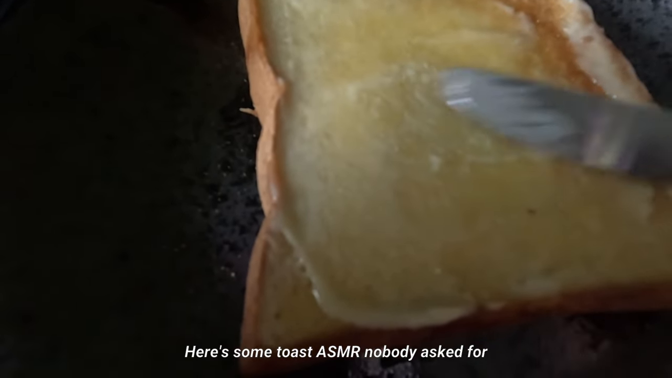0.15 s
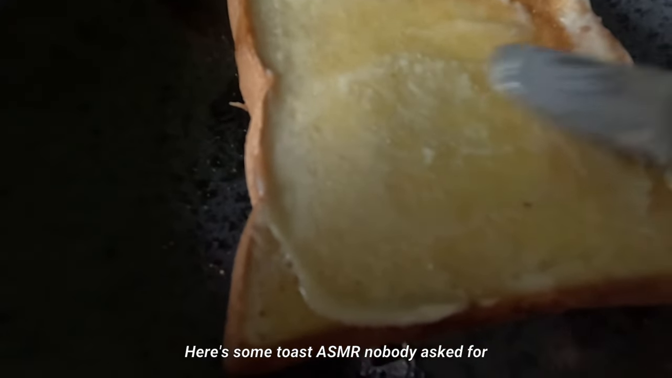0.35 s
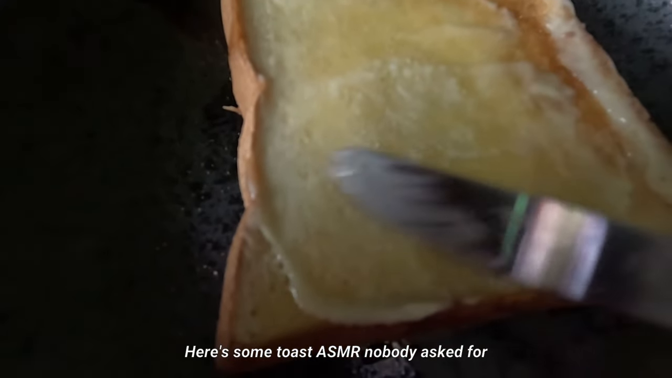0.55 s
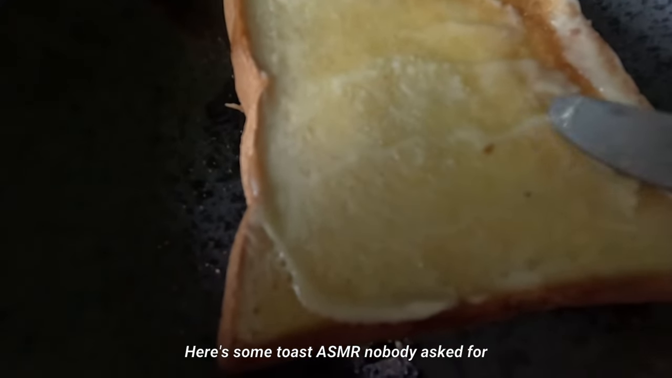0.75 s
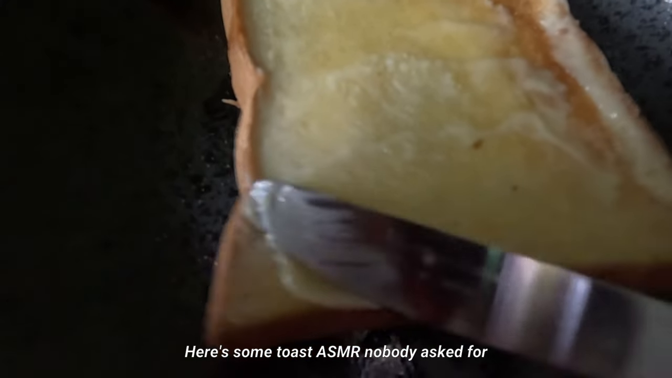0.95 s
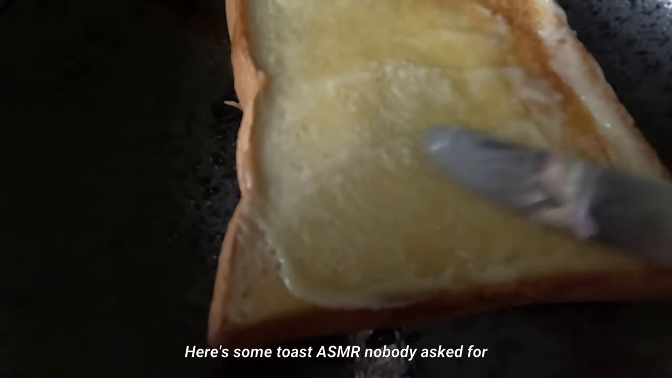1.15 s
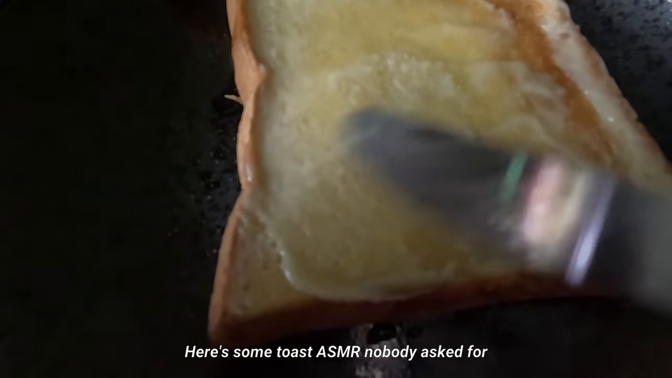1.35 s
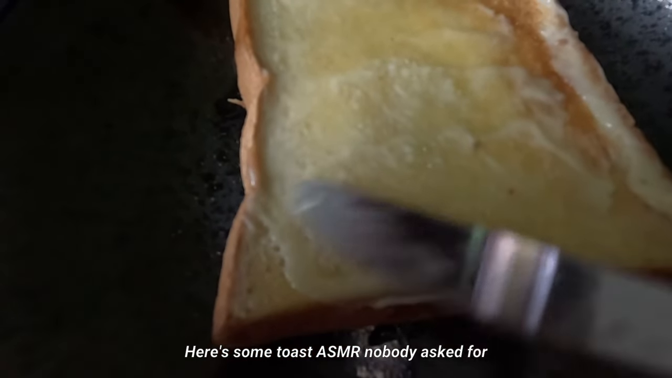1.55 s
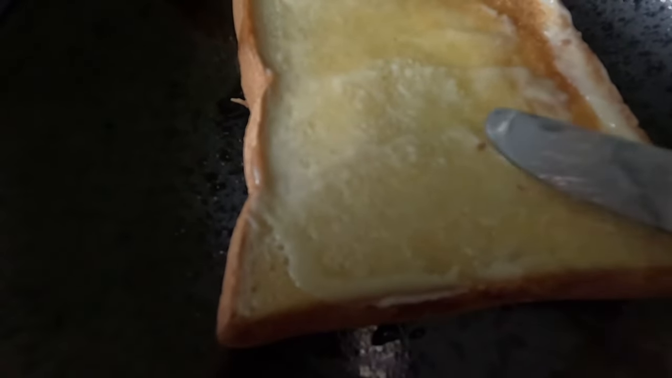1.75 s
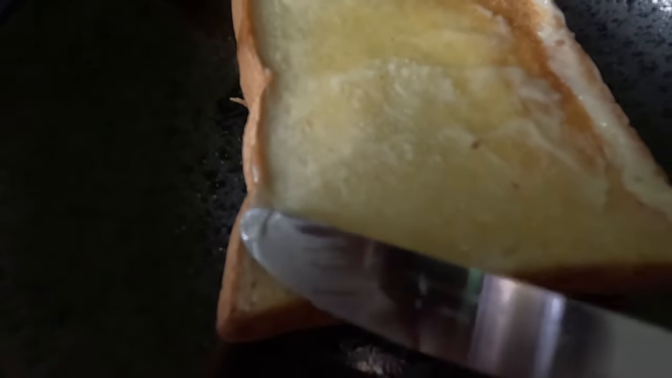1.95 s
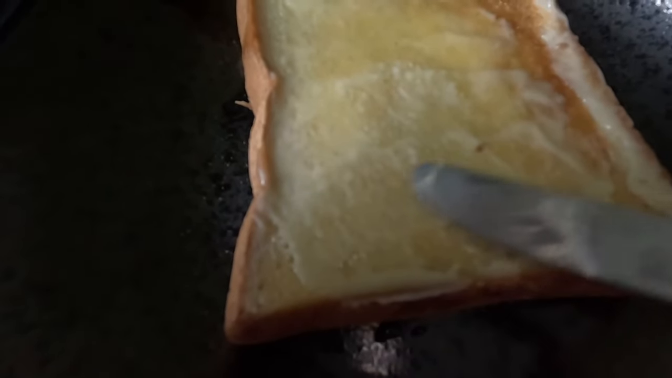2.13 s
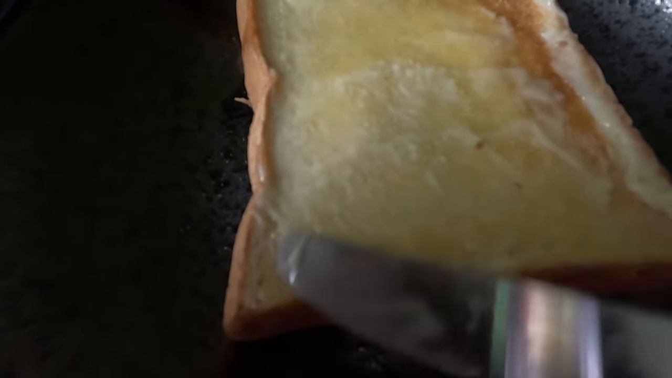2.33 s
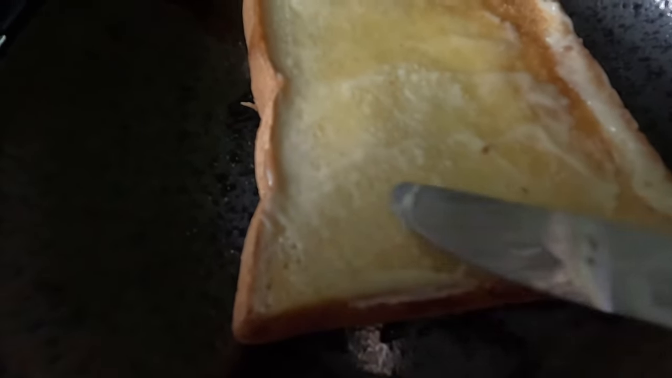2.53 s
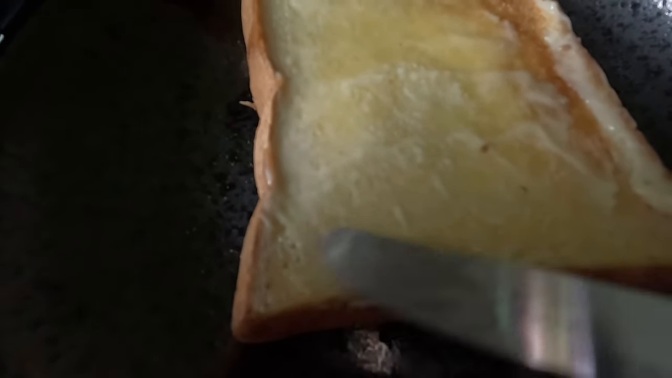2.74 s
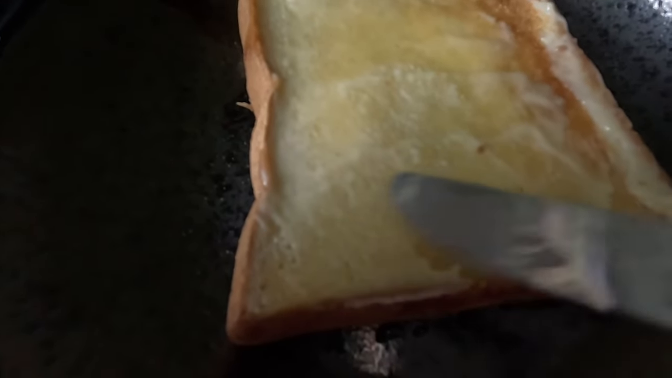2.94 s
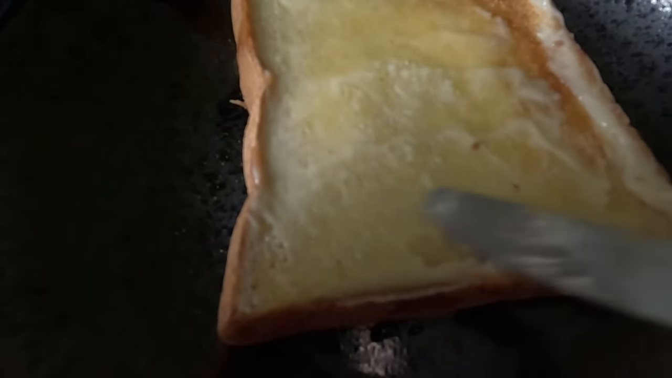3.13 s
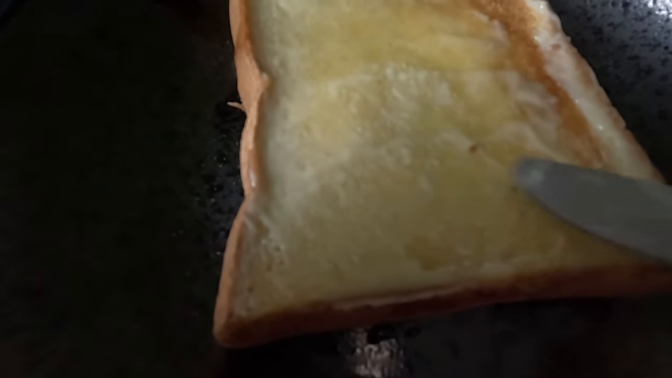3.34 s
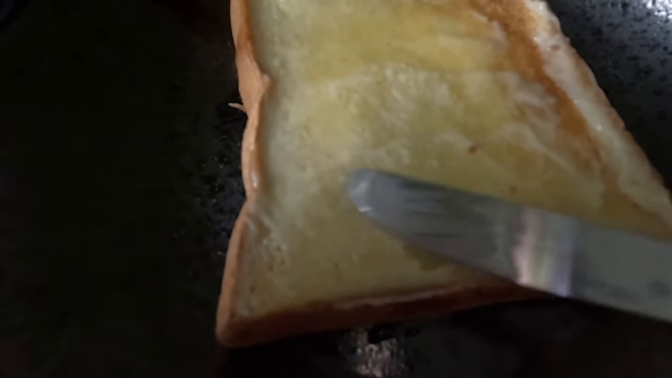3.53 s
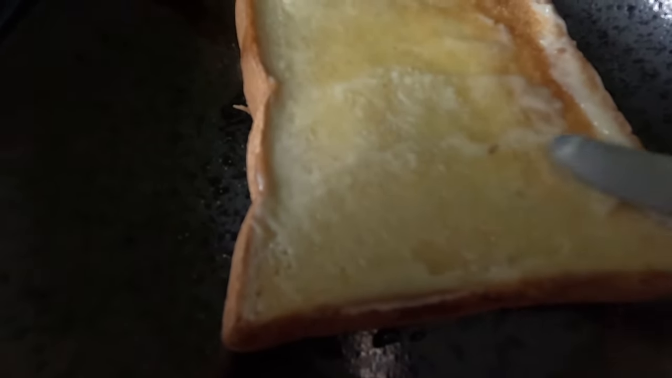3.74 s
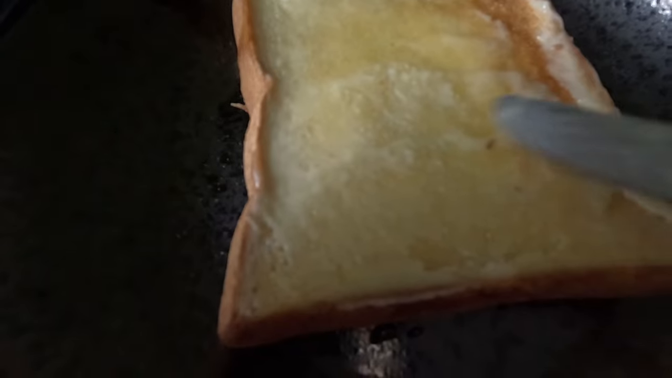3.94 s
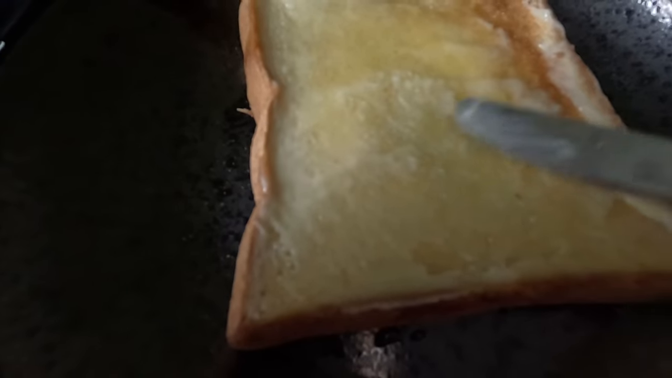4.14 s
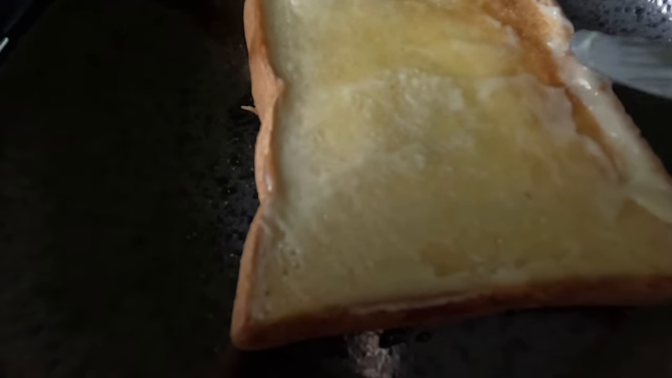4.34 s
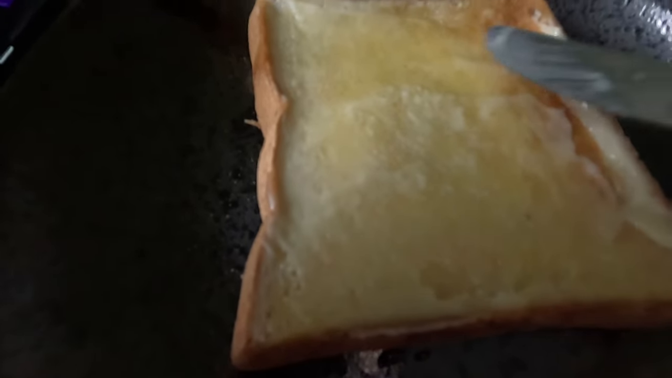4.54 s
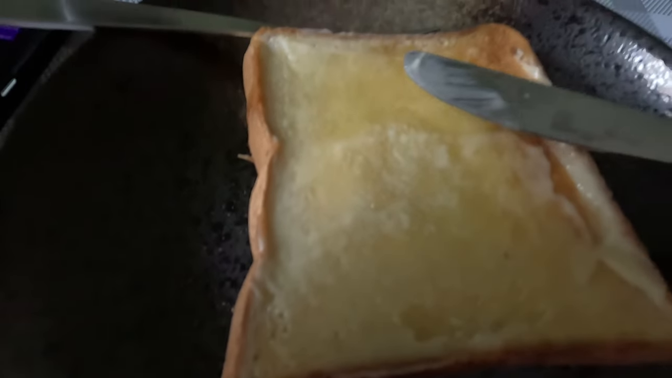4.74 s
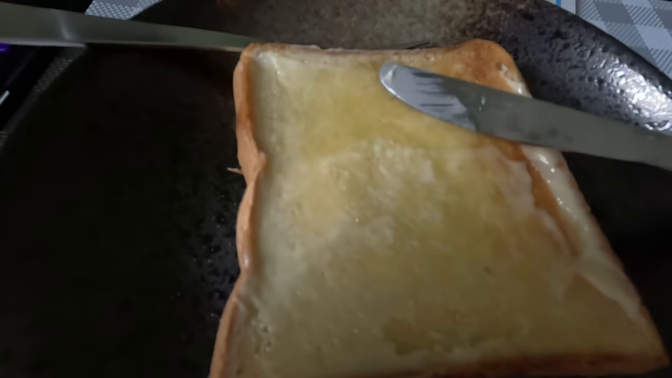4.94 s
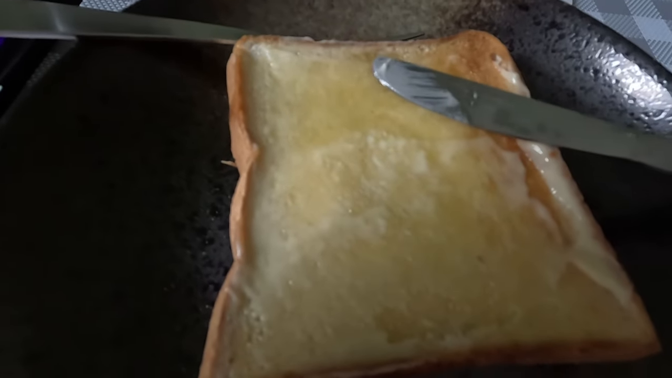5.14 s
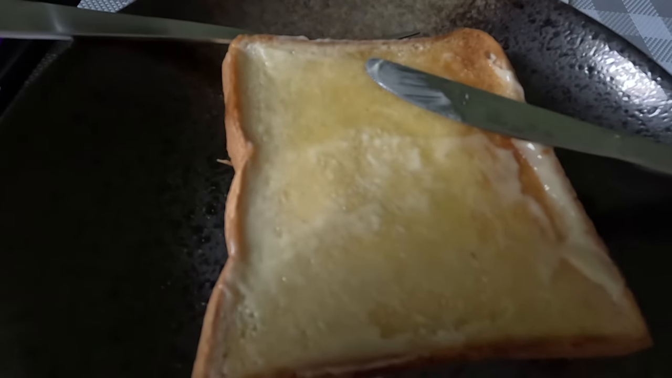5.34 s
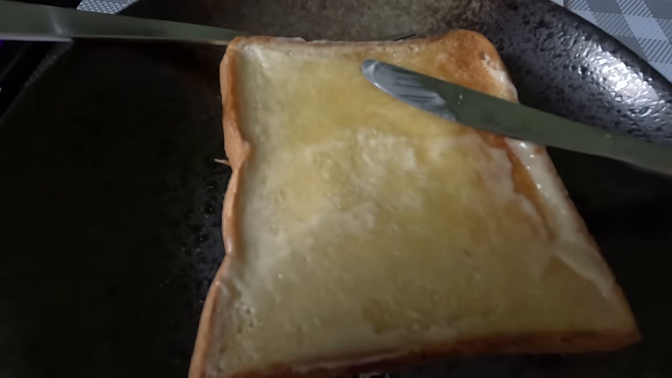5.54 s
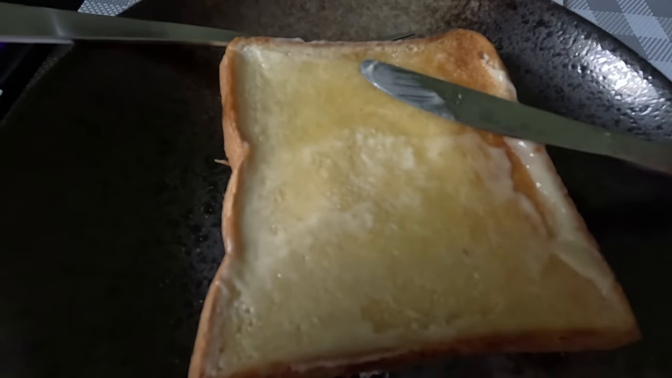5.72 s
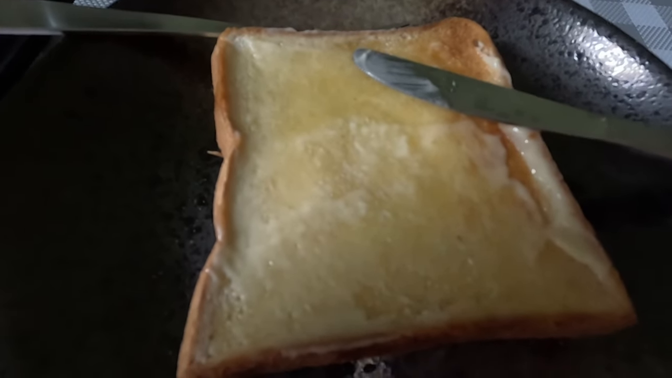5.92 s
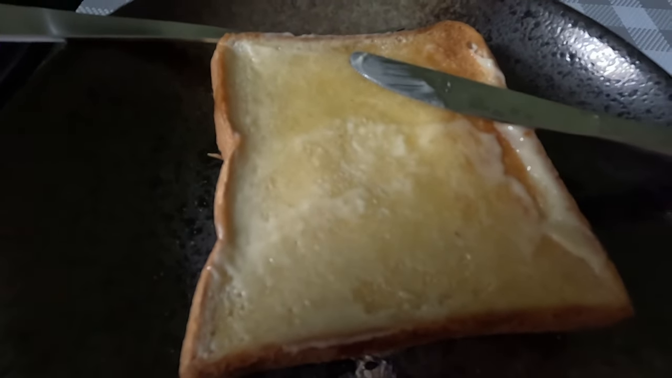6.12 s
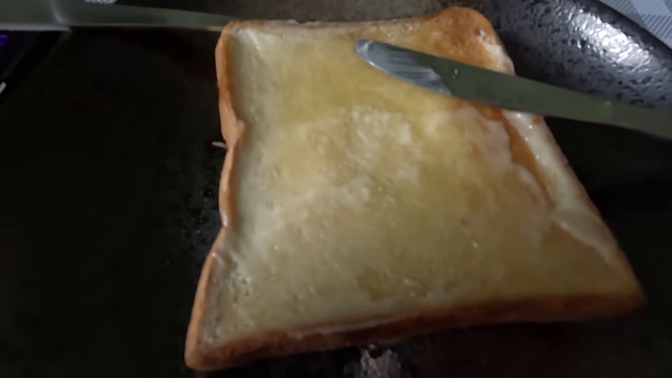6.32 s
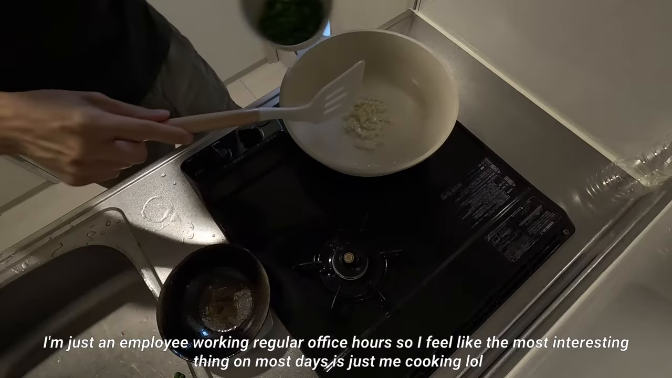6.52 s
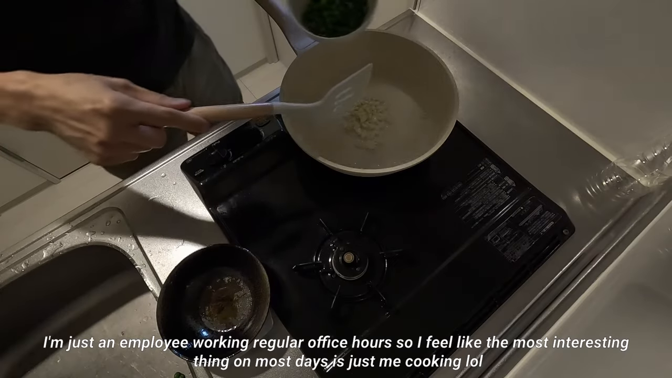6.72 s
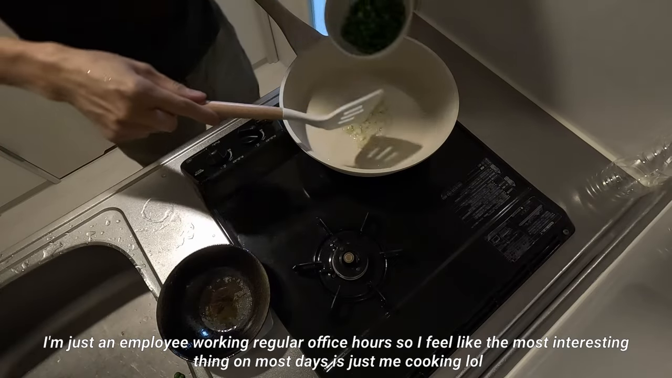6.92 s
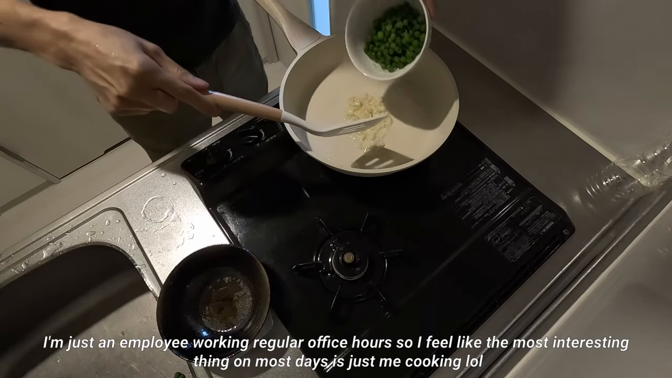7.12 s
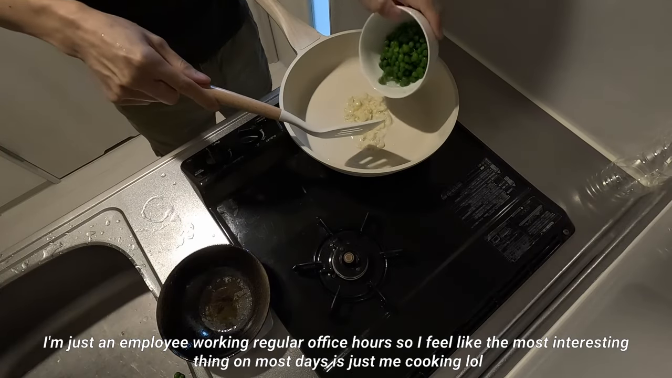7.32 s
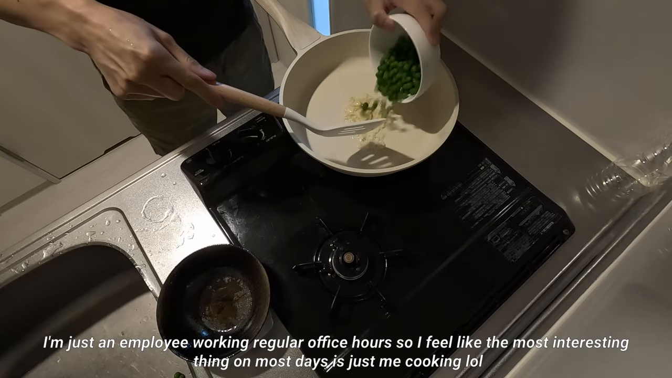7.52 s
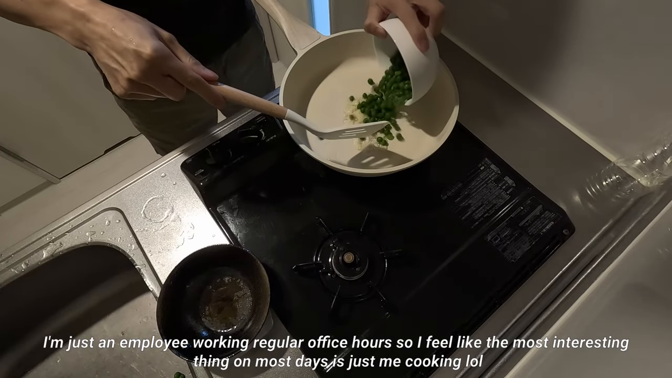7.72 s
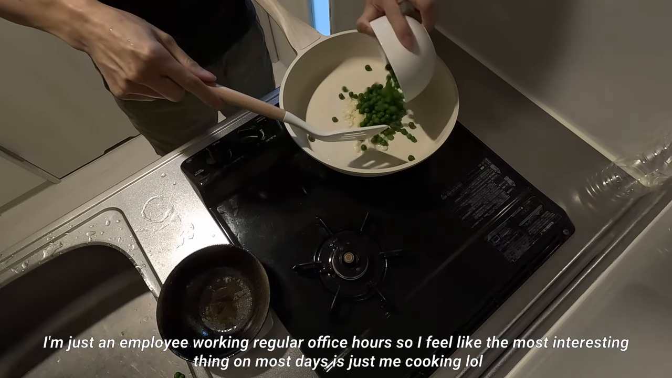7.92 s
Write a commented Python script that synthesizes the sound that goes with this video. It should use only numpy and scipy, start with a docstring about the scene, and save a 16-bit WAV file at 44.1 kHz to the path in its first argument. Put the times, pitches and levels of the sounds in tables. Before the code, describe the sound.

Close stereo phone pickup of short, dry, gritty knife strokes on toast, each with woody knocks and small steel ticks, over soft room hiss and small-kitchen echo. After a pause the blade slides and clatters sharply on a plate. Dull thumps jostle the phone. The sound abruptly switches to a low, hollow fan rush at a stove, and finally fine crackles as greens drop into the pan.

```python
"""A quiet kitchen: a table knife scrapes toast in short strokes close to a hand-held phone, then is laid on a plate.
Fracture noise excites crumb, crust and blade; catches, the plate and bumps ring as damped modes.
The hand bumps the phone; a cut leads to a stove under a roaring extractor hood, made of shaped noise, duct
resonances and blade tones, where chopped greens patter into a hot pan as dense clicks and short tones."""
import sys
import numpy as np
from scipy import signal
from scipy.fft import rfft, irfft, next_fast_len
from scipy.io import wavfile
from scipy.ndimage import uniform_filter1d

SR = 44100
rng = np.random.default_rng(int(sys.argv[2]) if len(sys.argv) > 2 else 0)


def bounce(signal):
    """Save signal as a 16-bit WAV file at the path given by the first command-line argument."""
    frames = np.transpose(np.atleast_2d(signal))
    limited = np.clip(frames, -1, 1)
    pcm = np.round(limited * 32767).astype(np.int16)
    wavfile.write(sys.argv[1], SR, pcm)


N = 355887
T = np.arange(N) / SR
SIZE = next_fast_len(N + 8192)  # transform length, padded for filter tails
HZ = np.maximum(np.fft.rfftfreq(SIZE, 1 / SR), 1)
LOG_HZ = np.log(HZ)
CUT_S = 6.458  # the kitchen gives way to the stove

# blade lands on or catches the crust:
# (time [s], knock level [dB], pitch of the slice [Hz], treble tick relative to knock [dB])
KNIFE_CATCHES = [(0.157, -37, 800, -12), (0.182, -35, 435, -4), (0.186, -27, 547, -24),
                 (0.202, -24, 1020, -2), (0.208, -19.5, 610, -7), (0.215, -20, 1050, -8),
                 (0.22, -20, 915, -10), (0.276, -33, 490, -20), (0.619, -39, 520, -14),
                 (0.655, -29, 484, -11), (0.678, -21, 980, -3.5), (0.688, -23, 890, -17),
                 (0.703, -26.5, 680, -8), (0.721, -16, 880, -15), (0.757, -33, 516, -21),
                 (0.778, -22.5, 820, -13), (1.077, -19, 700, -9), (1.145, -24, 1310, -10),
                 (1.161, -22, 635, -3.5), (1.188, -19, 656, -14), (1.204, -22, 640, -15),
                 (1.221, -31, 443, -6), (1.235, -34, 516, -8), (1.252, -25, 890, -22),
                 (1.255, -18, 510, -25), (1.269, -21.5, 592, -31), (1.315, -25, 1080, -14),
                 (1.585, -36, 610, 2), (1.618, -38, 1010, -8), (1.628, -36.5, 401, 3),
                 (1.655, -31, 684, -15), (1.728, -25.5, 470, -5), (1.742, -29, 543, -24),
                 (1.757, -25, 775, -25), (1.766, -21, 570, -20), (2.091, -26, 1900, -12),
                 (2.121, -33, 2260, 4.5), (2.129, -27, 947, -4), (2.167, -36, 1130, -21),
                 (2.18, -24, 1100, -22), (2.188, -22.5, 666, -27), (2.202, -18, 604, -22),
                 (2.229, -22.5, 1040, -14), (2.485, -28, 1450, -18), (2.526, -20.5, 1610, -6),
                 (2.541, -24, 1420, -2), (2.55, -22.5, 696, -5), (2.567, -28, 600, -17),
                 (2.6, -24.5, 584, -10), (2.628, -35, 500, -16), (2.793, -37, 1590, -30),
                 (2.837, -36, 1500, -14), (2.844, -29, 1450, -6), (2.86, -18.5, 1220, -13),
                 (2.894, -26, 422, -6), (3.16, -31, 485, -24), (3.182, -23.5, 670, -24),
                 (3.242, -32, 450, 7), (3.265, -29, 719, 5.5), (3.284, -29, 815, -6),
                 (3.303, -22.5, 535, -20), (3.321, -17.5, 980, -17), (3.338, -27, 1490, -13),
                 (3.366, -22, 1020, -15), (3.631, -39.5, 506, -25), (3.662, -36, 432, -6),
                 (3.687, -27, 473, -10), (3.69, -24, 556, -10), (3.704, -26, 950, -18),
                 (3.728, -24, 500, -8), (3.739, -21, 680, -12), (3.789, -25, 460, -15),
                 (3.885, -26.5, 540, -14), (4.237, -36, 720, -21), (4.34, -19, 420, -11),
                 (4.393, -36, 544, -18)]
# likeness of left and right for sources close by: (frequency [Hz], likeness [0-1])
NEAR_LIKENESS = [(60, 0.95), (130, 1), (290, 0.99), (640, 1), (1410, 1), (3100, 0.48), (6820, 0.71),
                 (15000, 0.47)]
# left minus right for sources close by: (frequency [Hz], level [dB])
NEAR_TILT = [(60, -6), (110, 0.5), (200, -0.5), (380, -1), (700, -1), (1290, 1), (2380, 0), (4400, -1),
             (8120, -2), (15000, 10.5)]
# likeness of left and right in the room: (frequency [Hz], likeness [0-1])
ROOM_LIKENESS = [(60, 1), (130, 0.8), (290, 0.89), (640, 0.79), (1410, 0.12), (3100, 0.69), (6820, 0.31),
                 (15000, 0.16)]
# left minus right in the room: (frequency [Hz], level [dB])
ROOM_TILT = [(60, 0), (110, 3), (200, 1), (380, -1), (700, 0.5), (1290, 2), (2380, 2.5), (4400, 1.5),
             (8120, 1.5), (15000, 10)]


def undb(db):
    """Decibel law: amplitude gain of a level in dB."""
    return 10 ** (np.asarray(db) / 20)


def unit(x):
    """Power normalisation: scale to rms 1."""
    return x / np.sqrt(np.mean(x ** 2))


def curve(rows):
    """Level envelope: (time [s], level [dB]) rows joined linearly, -120 dB outside."""
    rows = np.array(rows)
    return np.interp(T, rows[:, 0], rows[:, 1], -120, -120)


def along(points):
    """Logarithmic frequency scale: (frequency [Hz], value) points joined on it."""
    hz, value = np.transpose(points)
    return np.interp(LOG_HZ, np.log(hz), value)


def colour(x, points, size=8192):
    """Minimum-phase filtering: a causal response with the given dB spectrum, from the folded cepstrum; rms 1."""
    bins = np.linspace(0, len(HZ) - 1, size // 2 + 1).astype(int)
    cepstrum = irfft(np.log(undb(along(points)[bins])))
    cepstrum[1:size // 2] *= 2
    cepstrum[size // 2 + 1:] = 0
    response = irfft(np.exp(rfft(cepstrum)))
    return unit(irfft(rfft(x, SIZE) * rfft(response, SIZE), SIZE)[..., :N])


def pair(mid, other, likeness, lean):
    """Interchannel coherence: a shared part and an opposed part by band, leaning to one side."""
    coherence = np.clip(along(likeness), 0, 1)
    tilt = undb(along(lean) / 2)
    shared = rfft(mid, SIZE) * np.sqrt((1 + coherence) / 2)
    opposed = rfft(other, SIZE) * np.sqrt((1 - coherence) / 2)
    return irfft([(shared + opposed) * tilt, (shared - opposed) / tilt], SIZE)[:, :N]


def noise(*ports):
    """Diffuse field: white noise, partly coherent between the two ports."""
    return pair(*rng.standard_normal((2, N)), *ports)


def apart(x):
    """Decorrelation: time reversal keeps the spectrum of a noise and loses its likeness to x."""
    return x[:, ::-1]


def walk(rate):
    """Slow random modulation: levels held 1 / rate s and slewed; rms 1."""
    k = int(SR / rate)
    steps = np.repeat(rng.standard_normal(N // k + 1), k)
    return unit(uniform_filter1d(steps, k)[:N])


def clicks(rate, spread_db, bed, *ports):
    """Impulsive noise: random clicks of uneven, capped size over a bed of noise."""
    heights = undb(spread_db * np.minimum(rng.exponential(size=N), 4.5))
    size = unit((rng.random(N) < rate / SR) * heights) + bed
    return unit(pair(*(size * rng.standard_normal((2, N))), *ports))


def ticks(times, levels_db, lo_hz, hi_hz, fade):
    """Short transients: decaying band-limited bursts, two unrelated sets; fade in samples."""
    at = np.zeros(N)
    at[(np.array(times) * SR).astype(int)] = undb(levels_db)
    band = signal.butter(2, [lo_hz, hi_hz], "band", fs=SR, output="sos")
    burst = np.exp(-np.arange(1500) / fade) * rng.standard_normal((2, 1500))
    return signal.sosfilt(band, signal.oaconvolve(at[None], burst, axes=1)[:, :N])


def ring(x, hz, t60):
    """Damped oscillator: one mode driven by x, as a complex one-pole filter."""
    pole = np.exp(2j * np.pi * hz / SR - np.log(1000) / (t60 * SR))
    return signal.lfilter([1], [1, -pole], x).imag


def add(out, s, db, hz, t60):
    """Free decay: add a struck, exponentially dying tone, scaled to reach its level at the first crest."""
    i = int(s * SR)
    t = np.arange(min(int(t60 * SR), N - i)) / SR
    crest_gain = np.exp(np.log(1000) / (4 * hz * t60))
    out[i:i + len(t)] += undb(db) * np.sin(2 * np.pi * hz * t) * 1000. ** (-t / t60) * crest_gain


def hums(table, drive):
    """Resonance: a broad drive rings in narrow bands with steep skirts."""
    gain = sum(undb(db) / np.sqrt(w) / (1 + 1j * (HZ - hz) / w) ** 2 for hz, w, db in table)
    return irfft(rfft(drive, SIZE) * gain * np.sqrt(SR / np.pi), SIZE)[..., :N]


def strokes():
    """Contact force envelope: crumb, crust and blade levels as each push bites, swells, sags and lifts off."""
    # pushes of the edge: (bite time [s], bite level [dB], rise to the crest [s], crest level [dB],
    # crest to lift [s], lift level [dB], thin crust above crumb at bite, crest and lift [dB],
    # blade above crumb [dB])
    pushes = [(0.173, -45, 0.01, -34.5, 0.027, -31.5, 2, -1, 1.5, -13),
              (0.245, -47, 0.095, -33.5, 0.032, -37.5, -10, -5, -9.5, -11),
              (0.652, -40, 0.054, -25.5, 0.12, -35.5, -1.5, -4.5, -11, -12),
              (1.087, -50.5, .015, -48.5, 0.034, -53, 8, -3, -1, -11.5),
              (1.154, -31.5, 0.057, -25, 0.076, -30.5, 3, -3.5, -7, -11.5),
              (1.621, -45, 0.12, -26.5, 0.072, -38.5, 1, -2.5, -6, -9),
              (2.113, -55, 0.023, -44, 0.033, -52.5, 1, 3, 8, -2.5),
              (2.175, -41.5, 0.024, -30, 0.064, -33, 5.5, -0.5, -7, -12.5),
              (2.522, -43.5, 0.033, -29.5, 0.039, -35.5, 9, -0.5, -3, -12),
              (2.846, -45.5, 0.027, -34, 0.088, -38.5, 8, 2.5, -6, -11),
              (3.173, -45.5, 0.04, -35, 0.042, -32, 4, -3, -2, -15.5),
              (3.264, -33.5, 0.017, -34, 0.0081, -36, -2, 0, -7, -5),
              (3.294, -39, 0.0084, -39, 0.06, -33.5, 1, 2, -2, -13.5),
              (3.661, -53, 0.038, -33, 0.21, -41, -1, -1, -2, -12),
              (4.233, -48, 0.068, -41.5, 0.024, -44.5, 2, -4, -5, -10),
              (4.315, -45, 0.015, -37, 0.088, -45.5, -6, -7, -8, -13)]
    bite_db_per_s, lift_db_per_s = 1499.5, 341  # climb to the bite, fall after the lift
    drop_db, drop_s = 2, 0.0043  # the first fall as the edge leaves the crust
    skim_blade_db = -0.5  # blade at the bite, fading out by the crest
    dull_crust_db_per_s, dull_blade_db_per_s = 115, 86  # the treble dies first after the lift
    rasp_db, rasp_t60_s = -16.5, 0.025  # each catch tears off a short rasp, below its knock
    rasp_tilt_db = 3  # per octave: a high catch rasps in the crust, a low one in the crumb
    out = np.zeros((3, N))
    for s, bite_db, rise, crest_db, hold, lift_db, *crust_db, blade_db in pushes:
        live = slice(int(s * SR) - SR // 10, int((s + rise + hold) * SR) + SR // 4)
        t = T[live] - s
        corners = [0, rise, rise + hold]
        skim = np.clip(1 - t / rise, 0, 1)
        off = np.maximum(t - rise - hold, 0)
        db = np.interp(t, corners, [bite_db, crest_db, lift_db])
        db += bite_db_per_s * np.minimum(t, 0) - lift_db_per_s * off
        db -= drop_db * np.minimum(off / drop_s, 1)
        crust = db + np.interp(t, corners, crust_db) - dull_crust_db_per_s * off
        blade = db + blade_db + skim_blade_db * skim - dull_blade_db_per_s * off
        out[:, live] += undb([db, crust, blade])
    for s, db, hz, tick_db in KNIFE_CATCHES:
        live = slice(int(s * SR), int((s + rasp_t60_s) * SR))
        tilt_db = rasp_tilt_db * np.log2(hz / 750)
        fall_db = db + rasp_db - 60 * (T[live] - s) / rasp_t60_s
        out[:, live] += undb([fall_db - tilt_db, fall_db + tilt_db, fall_db + tick_db])
    return out


def quiet_kitchen():
    """Background noise: shaped air, a fridge's resonant hum and motor tone, and the holding hand's rumble."""
    # spectrum of the background hiss, steeply cut above 10 kHz: (frequency [Hz], density [dB per Hz])
    air_spectrum = [(100, -31), (200, -7), (300, -6.5), (400, -19), (800, -23), (1180, -15.5), (1900, -12),
                    (2300, -15.5), (2900, -16.5), (3800, -24.5), (6500, -28.5), (10000, -35.5),
                    (11500, -53), (15600, -67)]
    # room air: (time [s], level [dB])
    air_level = [(0.0, -68.5), (1.4, -68.5), (2.2, -65.5), (4.57, -61), (5.92, -66), (6.46, -65)]
    # fridge resonances: (frequency [Hz], width [Hz], level [dB])
    fridge = [(46, 14, -61), (103, 97, -64.5), (200, 7.4, -73), (287.6, 16, -73.5), (651, 43, -78.5),
              (1900, 120, -90.5), (2700, 50, -91)]
    # rumble of the holding hand: (time [s], level [dB])
    hand_level = [(0.0, -83), (1.5, -100), (2.2, -59), (4.6, -58.5), (5.9, -66.5), (6.46, -69)]
    hand_spectrum = [(15, 1.5), (30, -10.5), (55, 2.0), (75, -27), (200, -51.5)]
    motor_hz, motor_db = 147.4, -59
    shake_db, shake_s = -51, .08  # strokes shake the phone: below the crumb level, smeared in time
    hiss = noise(ROOM_LIKENESS, ROOM_TILT)
    air = colour(hiss, air_spectrum) * undb(curve(air_level) + 0.8 * walk(5.9))
    shake = undb(shake_db) * uniform_filter1d(strokes()[0], int(shake_s * SR))
    hand = colour(hiss, hand_spectrum) * (undb(curve(hand_level)) + shake) * undb(2.0 * walk(10))
    motor_phase = 2 * np.pi * motor_hz * T + 1.1 * walk(7.7)
    motor = undb(motor_db + 1.3 * walk(13)) * np.sqrt(2) * np.sin(motor_phase)
    return (air + hand + motor + hums(fridge, apart(hiss))) * (T < CUT_S)


def stove():
    """Flow noise and blade-passing tones: the hood rushes and its duct resonates; greens crackle in the oil."""
    # likeness of left and right at the stove: (frequency [Hz], likeness [0-1])
    likeness = [(30, 0.97), (60, 1), (130, 1), (290, 0.96), (640, 0.76), (1410, 0.34), (3100, 0.43),
                (6820, 0.62), (15000, 0.64)]
    # left minus right at the stove: (frequency [Hz], level [dB])
    lean = [(60, 0.33), (110, 0.18), (200, 2.2), (380, 1.2), (700, 8.8), (1290, 4.1), (2380, 3.3),
            (4400, 1), (8120, 0.76), (15000, 8)]
    # spectrum of the hood's rush: (frequency [Hz], density [dB per Hz])
    hood = [(15, -73), (40, 2.5), (62, -21), (97, -19), (140, -6), (200, -10), (500, -18), (1200, -21.5),
            (1500, -23), (3400, -32.5), (6800, -41.5), (10400, -55), (11200, -62), (13000, -61),
            (15600, -77)]
    # duct resonances: (frequency [Hz], width [Hz], level [dB])
    duct = [(38, 3.8, -42), (85, 3.3, -33), (118.4, 17, -35.5), (233.8, 7.2, -47), (273, 53, -48),
            (377.5, 21, -49), (679, 18, -53), (613, 8.8, -59), (772.5, 11, -54.5), (995.5, 31, -49.5),
            (1095, 27, -47.5), (1386, 9.2, -55.5), (1870, 130, -55), (2505, 34, -60.5), (3360, 290, -58)]
    # tones of the fan blades: (frequency [Hz], level [dB])
    fan_lines = [(522.2, -45), (834.4, -54), (1044, -52.5)]
    # patter and sizzle of the greens: (time [s], level [dB])
    greens = [(7.55, -82), (7.7, -63), (7.75, -53), (7.78, -65), (7.84, -54), (8.0, -60.5), (8.07, -53.5)]
    # single drops: (time [s], level before the band filter [dB], frequency [Hz])
    drop_rows = [(7.6921, -44, 3680), (7.7446, -39, 5570), (7.8128, -49, 3990), (7.8448, -49, 7000),
                 (7.8842, -42, 7400), (7.9101, -45, 4000), (8.0443, -29, 4100)]
    fizz_spectrum = [(2000, -48), (4000, 6), (7000, 13.5), (10000, 1.5), (15000, -20)]
    hood_db, waver_db = -37, 1.5
    air = noise(likeness, lean)
    rush = colour(air, hood) * undb(hood_db + 0.2 * walk(11))
    tones = np.zeros(N)
    for hz, db in fan_lines:
        level = undb(db + waver_db * walk(7.3)) * np.sqrt(2)
        tones += level * np.sin(2 * np.pi * hz * T + 0.12 * walk(4.3))
    spit = clicks(3600, 2.2, 0.2, likeness, lean)
    fizz = colour(spit, fizz_spectrum) * undb(curve(greens))
    drops = np.zeros(N)
    for s, db, hz in drop_rows:
        add(drops, s, db, hz, 17.0 / hz)
    drops = signal.sosfilt(signal.butter(3, [3000, 9000], "band", fs=SR, output="sos"), drops)
    onset = np.clip((T - CUT_S) / 0.00052, 0, 1)
    lean_tones = tones * undb([[1.5], [-1.5]])
    return (rush + hums(duct, apart(air)) + lean_tones + fizz + drops) * onset


def room(x, t60, damp_hz):
    """Reverberation: convolution with exponentially dying noise, partly coherent between the ports."""
    t = np.arange(int(t60 * SR)) / SR
    tail = rng.standard_normal((2, len(t))) * 1000. ** (-t / t60) * np.clip(t / 0.0081, 0, 1)
    tail = signal.sosfilt(signal.butter(1, [250, damp_hz], "band", fs=SR, output="sos"), tail)
    tail = unit(tail) / np.sqrt(len(t))
    mid, other = signal.fftconvolve(x.mean(axis=0)[None], tail, axes=1)[:, :N]
    return pair(mid, other, ROOM_LIKENESS, ROOM_TILT)


def bumps():
    """Impact response: damped knocks that reach both ports alike, with a dry tick."""
    # low thumps and short knocks, some under the last stroke and the plate blow:
    # (time [s], level [dB], frequency [Hz], 60 dB decay [s], tick level before its band filter [dB],
    # polarity: 1 upward first swing, -1 downward first swing)
    knocks = [(4.33, -42, 99, 0.063, -73, 1), (4.387, -30, 90.5, 0.046, -74, 1),
              (5.065, -28.5, 770, 0.0048, -52, 1), (5.069, -47, 198, 0.1, -75, -1),
              (5.405, -44, 240, .09, -73.5, 1), (6.251, -40, 60.4, 0.083, -68, 1),
              (6.329, -34.5, 44.4, 0.03, -54, 1), (6.377, -31, 35, 0.031, -70, 1),
              (6.387, -31.5, 30, 0.021, -65, -1), (6.387, -39, 1260, 0.013, -61, 1),
              (6.408, -42.5, 50.6, 0.012, -26.5, 1)]
    upward, downward = np.zeros(N), np.zeros(N)
    for row in knocks:
        add(upward if row[5] > 0 else downward, *row[:4])
    tick = ticks([b[0] for b in knocks], [b[4] for b in knocks], 730, 6900, 64.0)[0]
    return upward - downward + tick


def plate():
    """Modal excitation: blows and a drag ring plate modes that die in two stages, fast then slow; blows crack."""
    # modes of the plate: (frequency [Hz], level [dB], 60 dB decay of the slow stage [s])
    modes = [(315, -34, 0.16), (470, -31, 0.15), (1035, -26, 0.13), (1195, -27, .1), (1306, -20, .07),
             (1520, -20, .09), (1715, -21, 0.07), (2017, -25, 0.22), (2200, -11, 0.09), (2929, -9, 0.11),
             (2976, -25, .25), (3042, -6, 0.11), (3350, -25, .08), (3935, -17, .1), (4011, -10.5, 0.2),
             (4125, -22, 0.13), (4355, -9, .06), (4890, -19, .07), (5094, -7, 0.22), (5800, -20, .05),
             (6100, -9, 0.11), (6323, -18, 0.24), (6900, -28, .07), (7359, -17, .15), (7640, -19, .18),
             (7850, -20, .13), (8230, -24, 0.13), (8893, -23, .15), (9080, -23, .13), (9600, -19, .12),
             (9860, -24, 0.15), (10620, -30, .1), (11370, -23, .08), (11900, -27, .08), (12400, -24, .09),
             (14270, -33, 0.065)]
    # left minus right of the modes: (frequency [Hz], level [dB])
    lean = [(300, 1), (1500, -5), (2200, -1), (3000, 2), (4000, 7.5), (4350, 3), (5100, -5.5), (6200, 5),
            (8000, 8.5), (14000, 8)]
    # steel chatters on the plate: (time [s], blow into the low modes [dB],
    # blow into the rim's high modes [dB], push length [ms])
    blows = [(5.394, -48, -56, 0.2), (5.4044, -19, -28, .05), (5.4075, -25, -22, 0.07),
             (5.4122, -30, -25, 0.07), (5.4147, -32, -29, 0.05), (5.556, -41, -56, 0.25),
             (5.582, -49, -66, .4), (5.601, -56, -66, 0.4)]
    # steel drags on the plate: (time [s], level [dB])
    slide = [(4.88, -92), (4.922, -73), (4.992, -79), (5.036, -78), (5.08, -80)]
    # spectrum of the crack: (frequency [Hz], level [dB])
    crack_spectrum = [(500, -40), (850, -24), (1100, -2), (2300, 2), (4500, -3), (5400, -14), (9000, -18),
                      (12500, -22), (15000, -40)]
    slide_ring_db = -19  # how much of the drag rings the plate
    rim_hz = 3700  # modes above this belong to the rim
    high = signal.butter(5, 6600, "high", fs=SR, output="sos")
    drag = signal.sosfilt(high, rng.standard_normal(N)) * undb(3.0 * walk(60))
    push = np.zeros((2, N))
    for s, low_db, high_db, ms in blows:
        n = int(ms * SR / 1000) + 3  # a softer contact pushes longer and sounds duller
        i = int(s * SR)
        push[:, i:i + n] += undb([[low_db], [high_db]]) * np.hanning(n) / np.hanning(n).sum()
    live = slice(int(slide[0][0] * SR), int(blows[-1][0] * SR) + SR // 2)
    burst = np.exp(-np.arange(2000) / 180.0) * rng.standard_normal((2, 2000))
    crack = signal.oaconvolve(push[:1], burst, axes=1)[:, :N]
    crack = colour(crack, crack_spectrum) * np.std(crack)
    out = np.array([crack[0], 0.87 * crack[0] + 0.48 * crack[1]]) + undb(curve(slide)) * drag
    push += undb(curve(slide) + slide_ring_db) * drag
    lean_hz, lean_db = np.transpose(lean)
    for hz, db, t60 in modes:
        hit = push[int(hz > rim_hz), live]
        tilt = undb(np.interp(hz, lean_hz, lean_db) / 2)
        slow = ring(hit, hz, t60)
        fast = ring(hit, hz * 1.002, 0.35 * t60)
        out[:, live] += undb(db) * np.array([(slow + 1.17 * fast) * tilt, (slow + 0.8 * fast) / tilt])
    return out


def catches():
    """Impact and friction: the slice knocks dully, the blade ticks broadly, and its flat squeaks."""
    # the flat of the blade squeaks on the butter: (time [s], length [s], level [dB])
    squeaks = [(1.085, 0.048, -51.5), (1.617, 0.028, -50), (2.111, 0.035, -44)]
    # modes of the flat: (frequency [Hz], level [dB])
    flat = [(1740, -2), (2300, 0), (2850, -6), (3170, -6), (4250, -10), (5600, -10)]
    # loose crumbs snap off: (time [s], level before the band filter [dB])
    snaps = [(0.378, -31), (0.409, -46), (0.421, -41), (0.845, -34), (1.1333, -32), (1.8194, -41),
             (1.8352, -47), (2.1107, -39), (2.15, -33), (2.2693, -32)]
    start_s = .001  # each knock and its tick start 1 ms after the listed time
    overtone, overtone_db = 2.1, -16  # frequency ratio and level of the knock's overtone
    flat_t60_s = .06
    knock = np.zeros(N)
    for s, db, hz, _ in KNIFE_CATCHES:
        add(knock, s + start_s, db, hz, 8.5 / hz)
        add(knock, s + start_s, db + overtone_db, hz * overtone, 3.6 / hz)
    for s, length, db in squeaks:
        i, n = int(s * SR), int(length * SR)
        squeak = np.zeros(n)
        for hz, mode_db in flat:
            squeak += undb(mode_db) * unit(ring(rng.standard_normal(n), hz, flat_t60_s))
        knock[i:i + n] += undb(db) * signal.windows.tukey(n, .5) * squeak
    knock = signal.sosfilt(signal.butter(2, 330, "high", fs=SR, output="sos"), knock)
    s, db, _, tick_db = np.transpose(KNIFE_CATCHES)
    tick = ticks(s + start_s, db + tick_db, 2650, 7200, 33.7)
    tick = tick + ticks(*np.transpose(snaps), 1500, 6250, 40.0)
    return pair(knock + tick[0], knock + tick[1], NEAR_LIKENESS, NEAR_TILT)


def scrape():
    """Stick-slip fracture: big crust cells break and shake crumb and crust, fine ones ring the blade."""
    # spectrum of the crumb: (frequency [Hz], density [dB per Hz])
    crumb_spectrum = [(35, -55.5), (60, -20), (117, -25.5), (241, -5), (312, -6), (447, 2.5), (601, -4.5),
                      (701, 2.5), (1300, -29.5), (1690, -59), (2860, -120)]
    # spectrum of the thin crust: (frequency [Hz], density [dB per Hz])
    crust_spectrum = [(500, -42), (900, 10), (1100, 8), (1500, 2.5), (2100, -1), (2500, -19.5), (2900, -23),
                      (3300, -41)]
    # spectrum of the blade: (frequency [Hz], density [dB per Hz])
    blade_spectrum = [(2000, -15.5), (2800, 8.5), (3300, -6.5), (4200, 7.5), (5300, -3.5), (7000, 2.5),
                      (8300, -12), (10000, -8.5), (10900, -31), (12200, -17), (13400, -20.5), (14300, -27),
                      (15600, -34)]
    # modes of the blade, damped by butter: (frequency [Hz], width [Hz], level [dB])
    blade_modes = [(3510, 690, 2.5), (3910, 400, -3.5), (4780, 470, -0.5), (5400, 200, -9), (7260, 210, -5),
                   (7150, 130, -6), (9100, 185, -10), (11400, 360, -14.5), (12000, 120, -14),
                   (14100, 270, -27)]
    # modes of the slice: (frequency [Hz], width [Hz], level [dB])
    slice_modes = [(392, 80, -6.5), (512.3, 29.5, 1.5), (601, 45, 3), (685, 33, 0.5), (901, 45, -0.5),
                   (1035, 65, -4), (1408, 88, -10), (1765, 86, -11.5)]
    wander_db = 4.5
    slip = undb(0.72 * walk(50))  # the edge sticks and slips
    cells = slip * clicks(1500, 1.37, 0.33, NEAR_LIKENESS, NEAR_TILT)
    fine_clicks = clicks(3500, 3.0, 0.19, NEAR_LIKENESS, NEAR_TILT)
    fine = slip * undb(2.3 * walk(70)) * fine_clicks + 0.58 * cells
    crumb, crust, steel = strokes()
    # the contact point wanders along the blade, so its modes wax and wane in three sets
    rings = sum(undb(wander_db * walk(25.11)) * hums(blade_modes[k::3], fine) for k in range(3))
    blade = unit(colour(fine, blade_spectrum) + 0.82 * unit(rings))
    body = unit(sum(undb(wander_db * walk(20.57)) * hums(slice_modes[k::3], cells) for k in range(3)))
    soft = unit(colour(cells, crumb_spectrum) + 0.48 * body)
    return crumb * soft + crust * colour(cells, crust_spectrum) + steel * blade


def scene():
    """Superposition: direct sounds add to the small kitchen's echo of toast, plate and knocks."""
    toast = scrape() + catches()
    china = plate()
    knocks = bumps()
    echo = undb(-26.5) * room(toast + 4.1 * knocks, 0.41, 5700)
    echo = echo + undb(-15.5) * room(china, 0.3, 5500)
    return toast + china + echo + knocks + quiet_kitchen() + stove()


def record(dry):
    """Phase delay and band limits: the left port lags in the lower bands; the phone cuts bottom and top."""
    lag_s, lag_hz = 43.75e-6, 3400  # the lag fades out around this frequency
    bottom_hz, top_hz = 29, 15720
    late = np.exp(-2j * np.pi * HZ * lag_s / (1 + (HZ / lag_hz) ** 4))
    ports = np.array([irfft(rfft(dry[0], SIZE) * late, SIZE)[:N], dry[1]])
    ports = signal.sosfilt(signal.butter(2, bottom_hz, "high", fs=SR, output="sos"), ports)
    return signal.sosfilt(signal.ellip(10, .2, 70, top_hz, fs=SR, output="sos"), ports)


dry = scene()
out = record(dry)
bounce(out)
```